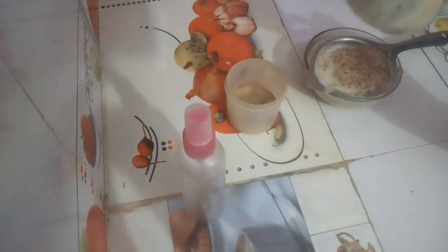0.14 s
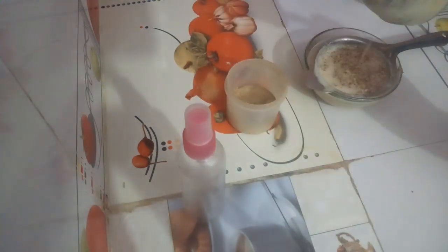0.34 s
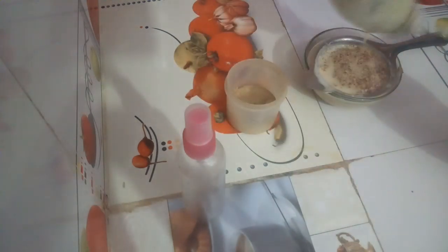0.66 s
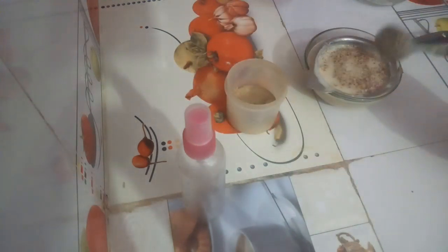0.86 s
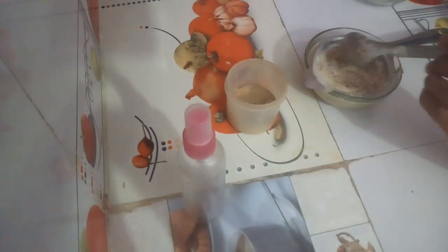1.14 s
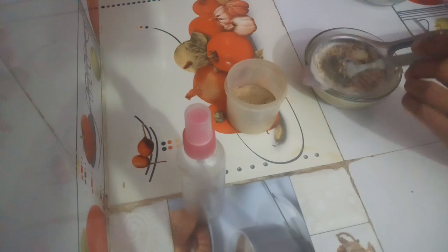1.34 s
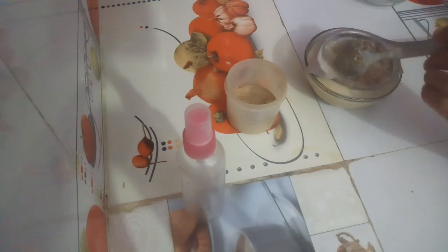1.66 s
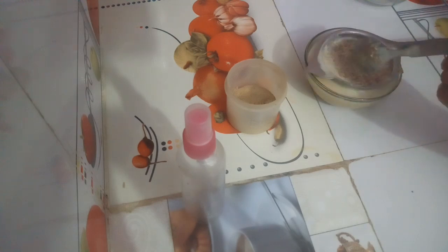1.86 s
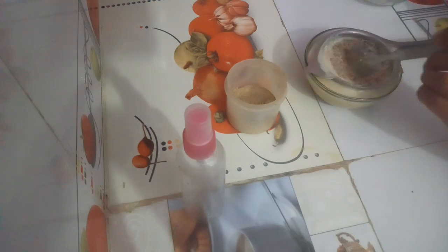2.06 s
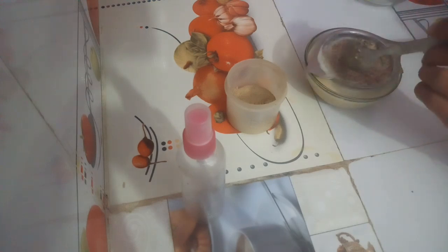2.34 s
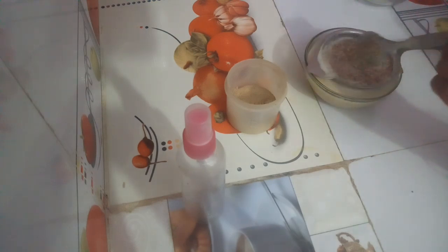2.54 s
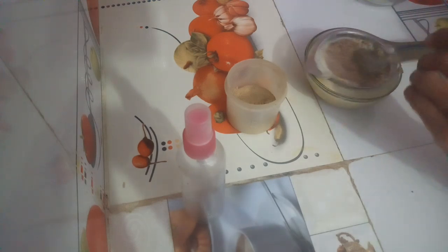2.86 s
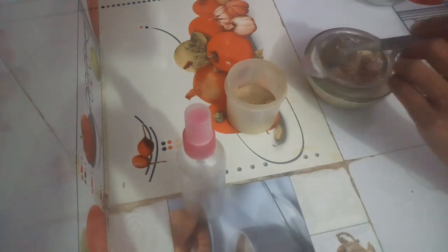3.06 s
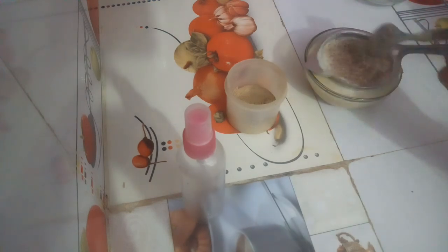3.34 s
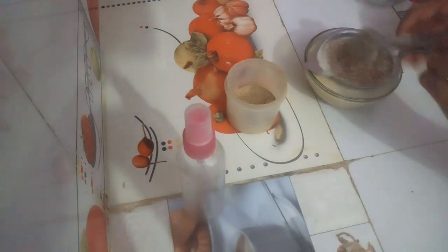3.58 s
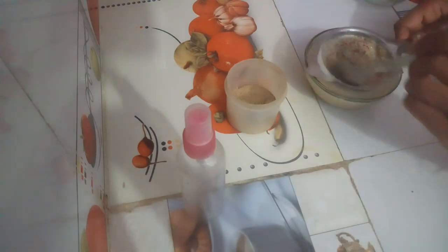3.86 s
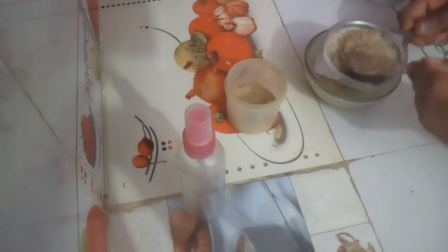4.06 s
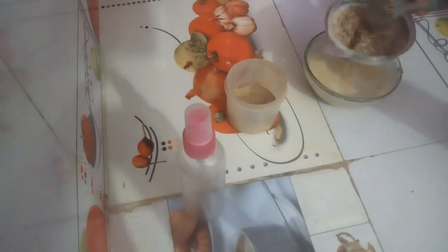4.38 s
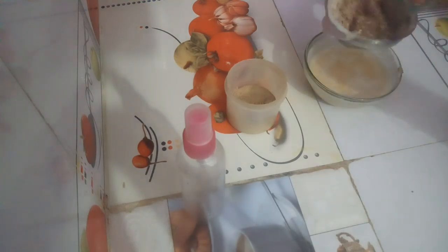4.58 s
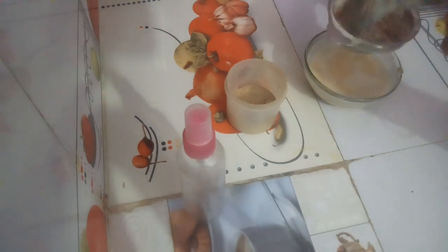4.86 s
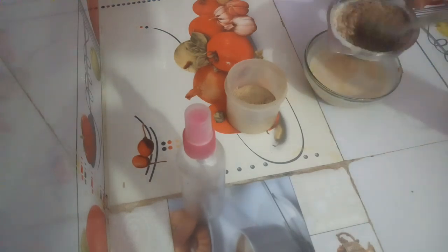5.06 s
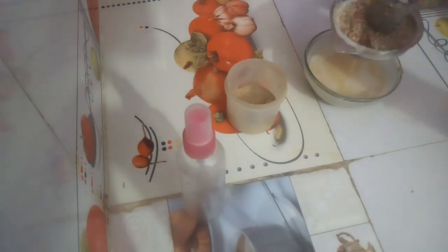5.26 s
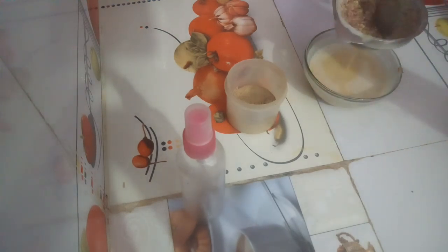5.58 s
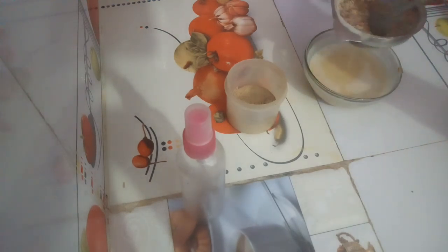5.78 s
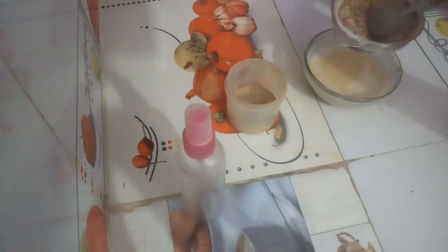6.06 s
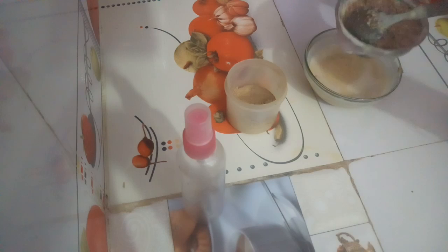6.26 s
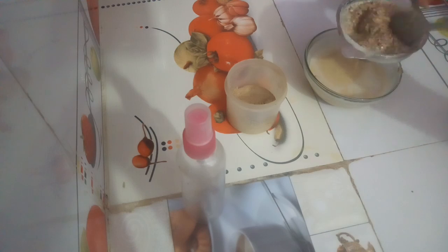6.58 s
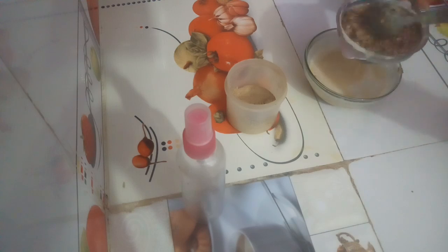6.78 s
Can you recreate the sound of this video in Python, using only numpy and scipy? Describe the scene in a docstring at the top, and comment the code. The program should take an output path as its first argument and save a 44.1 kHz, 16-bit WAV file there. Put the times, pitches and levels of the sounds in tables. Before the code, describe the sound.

Close microphone in a small tiled kitchen, with steady soft room noise and a low fridge-like hum. Paste rubs faintly on mesh as a cup is put down; a spoon is picked up and its handle knocks very loudly. After faint sliding, a glass bowl and its rim clink in two clusters. Light scrapes and ticks follow, then one hard mesh knock near the end.

```python
"""A small tiled kitchen. Over steady room noise and a fuzzy, fridge-like hum, a spoon rubs paste on a
strainer's mesh and a cup is put down: friction is dense clicks in three bands, a blow is chatter driving
resonances. Then the strainer's handle knocks; the bowl starts to bump, ringing the table top's low modes. The
spoon's edge hisses along the wires, the glass bowl and the strainer's rim are struck, and lighter mesh knocks
follow, with one hard mesh blow near the end. The tiles answer the near sounds with a short bright tail."""
import sys
import numpy as np
from scipy import signal
from scipy.fft import rfft, irfft
from scipy.io import wavfile
from scipy.ndimage import uniform_filter1d

SR = 44100
rng = np.random.default_rng(int(sys.argv[2]) if len(sys.argv) > 2 else 0)


def master_out(mix):
    """Clip the mix to full scale and print it as 16-bit PCM to the path in sys.argv[1]."""
    frames = np.transpose(np.atleast_2d(mix))
    ceiling = np.clip(frames, -1, 1)
    pcm = np.round(ceiling * 32767).astype(np.int16)
    wavfile.write(sys.argv[1], SR, pcm)


def volts_from_db(level):
    """Convert decibel levels to linear amplitude ratios."""
    exponent = np.asarray(level, float) / 20
    return 10 ** exponent


N = 305613  # length in samples
BLOCK = 88  # samples in one step of a gain curve, about 2 ms


def evened(x):
    """Normalization: scales a signal to rms 1."""
    return x / np.sqrt(np.mean(x ** 2) + 1e-20)


def read(points, hz):
    """Spectral interpolation: reads a curve on a logarithmic frequency axis."""
    point_hz, value = np.transpose(points)
    return np.interp(np.log(hz + 1), np.log(point_hz + 1), value)


def add(mix, start_s, sound):
    """Superposition: sums a sound into the mix from start_s on."""
    part = mix[round(start_s * SR):][:len(sound)]
    part += sound[:len(part)]


def band(x, lo_hz, hi_hz):
    """Band-pass filtering: keeps lo_hz to hi_hz, at rms 1."""
    sos = signal.butter(2, [lo_hz, hi_hz], "bandpass", fs=SR, output="sos")
    return evened(signal.sosfilt(sos, x))


def resonate(x, hz, width_hz):
    """Resonance by heterodyning: shifts hz (fixed or moving) to zero, low-passes, and shifts back."""
    turn = np.exp(2j * np.pi * np.cumsum(hz * np.ones(len(x))) / SR)
    decay = np.exp(-np.pi * width_hz / SR)
    return 2 * (turn * signal.lfilter([1 - decay], [1, -decay], x / turn)).real


def swells(rows):
    """Exponential growth and decay: one gain curve a row, rise and fall times each spanning 20 dB."""
    peak_s, rise_s, fall_s, level_db = np.array(rows).T[:4, :, None]
    late_s = np.arange(N // BLOCK + 1) * BLOCK / SR - peak_s
    return volts_from_db(level_db - 20 * np.maximum(-late_s / rise_s, late_s / fall_s))


def smooth(curve):
    """Linear interpolation: turns block values into sample values."""
    return np.interp(np.arange(N) / BLOCK, np.arange(len(curve)), curve)


# colour of the room noise: frequency (Hz), relative density (dB per Hz)
AIR_SPECTRUM = [(12, -55.5), (20, -23.5), (69, -20), (102, 4.5), (131, -9.5), (211, -14), (321, -23.5),
                (350, -20.5), (612, -8.5), (1680, -19.5), (2290, -29), (3030, -23.5), (10700, -43),
                (15000, -36.5), (16300, -43)]
# slow changes of the room noise: time (s), relative level (dB)
AIR_SWELL = [(0, -1), (1.2, -1), (1.9, -3.5), (2.6, 1), (4.2, 0.5), (5.8, 0.5), (6.93, 1.1)]
# appliance drone: frequency (Hz), width of each resonance stage (Hz), level (dB)
HUM = [(100.4, 16, -64), (210.5, 9.6, -70.5), (646.6, 40, -67.5)]


def kitchen():
    """Stationary random noise: coloured air with drifting patches, and a drone of noise in narrow resonances."""
    frames, hz = N // 256 + 5, np.fft.rfftfreq(1024, 1 / SR)
    real, imaginary, patches = rng.standard_normal((frames, 513, 3)).T
    patches = uniform_filter1d(uniform_filter1d(patches, 10, 0), 14, 1)  # over frequency, then time
    patches_db = 1.7 * evened(patches)
    time_s, swell_db = np.transpose(AIR_SWELL)
    swell_db = np.interp(np.arange(frames) * 256 / SR, time_s, swell_db)
    spectrum = (real + 1j * imaginary) * volts_from_db(read(AIR_SPECTRUM, hz)[:, None] + patches_db + swell_db)
    air = volts_from_db(-58) * evened(signal.istft(spectrum, nperseg=1024, noverlap=768)[1][:N])
    noise = rng.standard_normal(N)
    hum = 0
    for hum_hz, width_hz, level_db in HUM:
        drone = resonate(resonate(noise, hum_hz, width_hz), hum_hz, width_hz)
        hum = hum + volts_from_db(level_db) * evened(drone)
    return air + hum


# what each thing rings with, two lists: resonances as frequency (Hz), width (Hz; at least 19 is played),
# relative level (dB); then the colour of its clatter as frequency (Hz), relative density (dB per Hz)
CUP = [(1123, 63, -6), (1510, 140, -2), (2960, 120, 0), (4850, 120, 2), (5000, 99, 0), (6750, 150, -7),
       (7270, 160, 0), (8350, 140, 0), (10140, 69, 4.5), (11760, 90, -1.5), (12920, 90, -6.5),
       (13600, 110, 2), (14240, 69, -5)], [(180, -79), (300, -61.5), (1120, -3), (2270, -7), (3060, -4.5),
       (5980, -9.5), (10200, -5), (10900, -21), (13600, 0), (16300, -28.5)]
SPOON = [(1400, 270, -21), (1960, 160.7, -15), (2200, 76, -15), (2920, 100, -11), (4010, 70, 3.5),
         (4100, 100, -4), (4370, 75, -13), (5190, 83, -14), (6000, 142, -17), (6740, 90, -13.5),
         (6950, 130, -7), (10500, 97, -20.5), (12200, 82, -27.5)], [(180, -67), (300, -36.5), (1980, -8.5),
         (3500, -16.5), (4070, 1), (5500, -24), (7190, -17), (15200, -46.5), (16300, -101)]
HANDLE = [(1590, 120, -13), (3440, 34, -10.5), (3750, 62, -8.5), (4100, 21, -5.5), (4590, 49, -2),
          (5630, 34, -3), (6140, 46, -12), (7100, 140, -11.5), (8100, 100, -9.5), (8650, 31.24, -5.5),
          (10547, 40, -10), (12700, 28.26, -7), (15000, 190, -21), (15760, 44, -29)], [(59, -55.5),
          (100, -18), (344, -1.5), (696, -11.5), (1320, -11), (1560, -12.5), (2720, -9.5), (5740, -2.5),
          (13200, -12.5), (16300, -21)]
MESH = [(1110, 31, -3), (1670, 120, 6), (2620, 110, 7), (4530, 260, 7), (4940, 120, -34), (7570, 100, -12),
        (8400, 120, 2), (8620, 75, 5), (10400, 120, 5), (12600, 300, 1)], [(180, -103), (300, -73),
        (647, -9.5), (1330, -6), (1680, 0.5), (3220, 0.5), (8350, 4.5), (14300, -15), (16300, -34)]
BOWL = [(770, 68, -18), (1226, 130, 7.5), (1337, 32, -16), (1800, 250, -10.5), (2083, 20, -26),
        (2670, 19, 6), (2757, 16, 3.5), (2844, 20, 9), (2887, 34, -5), (3084, 86, -3), (3250, 94, 4),
        (3500, 35, -22.5), (4190, 80, -4), (4384, 26, 3.5), (5590, 103, 1), (7930, 160, -11.5),
        (8900, 44, -39), (10300, 45, -10), (14050, 71, -12)], [(60, -46), (150, -19), (400, -9), (1200, -3),
        (3000, 1), (6000, -11), (8000, -26.5), (11000, -42), (16300, -59)]
RIM = [(1594, 59, -4), (2490, 22, -18), (2868, 61, -8), (3110, 54, -28), (3500, 17, 3.5), (4440, 73, -11.5),
       (4620, 28, -10), (5220, 28, -3), (6280, 55, -5), (6200, 14, -10), (7350, 100, -8), (7720, 49, -6.5),
       (8500, 93, -14), (11200, 110, -18), (12180, 100, -11), (11500, 41, -24), (12700, 74, -29),
       (13800, 30, -29), (15000, 27, -31), (15200, 150, -39)], [(59, -55), (100, -32), (344, -3), (2060, 2),
       (2900, -1), (3160, -4), (3440, -11), (6800, -16.5), (11600, -9.5), (16300, -27)]
# sharp blows: start_s, thing, level_db (nominal peak), hardness (dB per octave), chatter t60 (s),
# pitch_hz that the struck spot favours
BLOWS = [(0, "cup", -34.5, -3, 0.2, 8000), (.126, "cup", -32, -10, 0.038, 1560),
         (.21, "cup", -45.5, -6, 0.068, 3200), (.358, "cup", -13, 3, 0.032, 4780),
         (.36, "cup", -16, -4.5, 0.019, 1310), (.373, "cup", -23, 1.2, 0.1, 4510),
         (.398, "cup", -21, -2, 0.034, 3160), (0.411, "cup", -32.5, .4, 0.054, 2600),
         (.654, "spoon", -38.5, -11, .04, 3830), (.715, "spoon", -22.5, -1.5, 0.044, 1982),
         (.757, "spoon", -21.5, 7, 0.033, 4050), (.768, "spoon", -18.5, .3, 0.026, 4600),
         (.782, "spoon", -27, 6, 0.018, 7000), (1.018, "handle", 1, .87, 0.039, 8050),
         (1.03, "handle", -7, .3, 0.028, 5550), (1.04, "handle", -10.5, .3, .051, 4500),
         (1.067, "handle", -20, -0.78, .042, 4523), (1.328, "mesh", -47.5, 0, .03, 6800),
         (1.458, "mesh", -44.5, 4, 0.049, 4690), (2.666, "bowl", -6.5, 0.2, 0.069, 4200),
         (2.674, "bowl", -10, .6, .14, 2950), (2.688, "bowl", -14.5, 2.5, 0.061, 5700),
         (2.721, "bowl", -8.5, -1, 0.098, 2890), (2.746, "bowl", -12.5, -2, 0.21, 2770),
         (2.795, "bowl", -21.5, -5, 0.15, 3000), (3.018, "rim", -12.5, -0.4, 0.057, 6300),
         (3.031, "rim", -9.5, -0.2, 0.073, 2840), (3.045, "rim", -11.5, -0.5, 0.17, 3500),
         (3.403, "rim", -33, -3, 0.092, 4296), (3.411, "rim", -36, -7, 0.061, 735),
         (3.866, "bowl", -26, -3, 0.056, 1530), (3.952, "handle", -30.5, -4.5, .06, 4280),
         (4.047, "mesh", -43, -7, 0.019, 2960), (4.126, "handle", -43.5, 1, .04, 4290),
         (5.155, "mesh", -44, .1, .03, 6800), (5.457, "mesh", -47, -11, 0.017, 2200),
         (5.624, "mesh", -51.5, -1, .03, 3952), (5.958, "mesh", -44, 0, 0.018, 8500),
         (5.968, "mesh", -40, -7, .015, 4800), (5.987, "mesh", -38.5, -2.1, 0.017, 1860),
         (6.017, "mesh", -38, -7.5, 0.013, 1700), (6.058, "mesh", -50, -4, .012, 7530),
         (6.085, "mesh", -41, -9.5, 0.016, 5000), (6.212, "mesh", -46.5, -3.5, 0.022, 7710),
         (6.358, "mesh", -9, 0.1, 0.053, 8400), (6.363, "mesh", -15.5, 0.2, .03, 1670),
         (6.374, "mesh", -29, -1, 0.043, 1690), (6.7, "mesh", -50.5, -2, 0.035, 6400)]
# drags, whose chatter swells up to a peak: the same columns, then swell time (s)
DRAGS = [(.27, "cup", -49, -13.5, .03, 1400, 0.079), (.724, "spoon", -24.5, 0.5, 0.05, 2050, .04),
         (2.87, "bowl", -35.5, -.3, 0.31, 2899, 0.1), (3.15, "rim", -34, -4, 0.21, 1040, 0.032)]
# ring over clatter for a blow of nominal 0 dB: thing, level (dB)
RING_DB = {"cup": 0, "spoon": 3.5, "handle": -2, "bowl": 1, "rim": 1.5, "mesh": 0.5}


def struck(name, thing):
    """Modal excitation: a dying chatter of contacts drives the resonances and a dense clatter."""
    modes, clatter = thing
    mode_hz, width_hz, mode_db = np.transpose(modes)[:, :, None]
    t, out = np.arange(SR // 2) / SR, np.zeros(N)
    f = np.fft.rfftfreq(len(t), 1 / SR)
    responses = volts_from_db(mode_db) / (1 + 2j * (f - mode_hz) / np.clip(width_hz, 19, 900))
    response = responses[::2].sum(0) - responses[1::2].sum(0)  # alternate modes swing in opposite phase
    dense = volts_from_db(read(clatter, f))
    rows = [row for row in BLOWS + DRAGS if row[1] == name]
    for start_s, _, level_db, hardness, t60_s, spot_hz, *drag in rows:
        swell_s = sum(drag)  # 0 for a blow
        rise = np.minimum(t / swell_s, 1) ** 2 if drag else 1 - np.exp(-t / 0.0004)
        contact = rise * volts_from_db(-60 * np.maximum(t - swell_s, 0) / t60_s)
        chatter, hiss, slips = rng.standard_normal((3, len(t)))
        bounce_db = 3.5 if drag else 2.2
        contact = contact * volts_from_db(bounce_db * evened(uniform_filter1d(slips, 70)))  # it bounces unevenly

        spot_db = 9 * np.exp(-(np.log2(f / spot_hz + 1e-9) / 0.18) ** 2)
        tilt = volts_from_db(hardness * np.log2(f / 4000 + 0.03) + spot_db)  # a harder contact is brighter
        push = chatter * contact
        if not drag:
            push[10] += 14  # one sharp contact on top of the chatter
        ring = irfft(rfft(push) * response * tilt, len(t))
        ring = ring * np.clip(5 - 12 * t, 0, 1)  # faded out from 0.33 to 0.42 s
        hiss = contact * irfft(rfft(hiss) * dense * tilt, len(t))

        ring_db = RING_DB[name] + 0.087 * level_db  # softer blows ring less
        blow = volts_from_db(ring_db) * ring / np.linalg.norm(ring) + hiss / np.linalg.norm(hiss)
        onset = blow[t < 1.5 * swell_s] if drag else blow[:300]
        add(out, start_s, volts_from_db(level_db - 10.5) * blow / np.std(onset))  # onset rms 10.5 dB below the peak
    return out


# spoon rubbing paste over the mesh: peak_s, rise time (s), fall time (s), pressure as scrape level (dB),
# brightness as fizz over scrape (dB), weight as body over scrape (dB)
STROKES = [(0.005, 0.03, 0.29, -56, -4.5, -17), (.132, 0.065, 0.17, -63.5, -20, 10.5),
           (.56, 0.13, 0.31, -54.5, -10, -0.3), (1.33, .01, 0.072, -57, -7, -14),
           (1.458, 0.024, 0.093, -53.5, -7, 0), (1.602, 0.13, 0.22, -57.5, -11, -0.8),
           (2.962, 0.079, 0.087, -56, -12.5, 12), (3.36, 0.05, .08, -54.5, -11, 1),
           (3.402, 0.0074, 0.085, -46, -9, -13), (3.55, .1, 0.43, -63.5, -9, 0.5),
           (3.867, 0.022, 0.055, -50, -10, 4), (3.95, .02, 0.091, -46.5, -9, -16),
           (4.1, 0.17, 0.23, -61.5, -5.5, -11), (5.158, 0.17, 0.059, -68, -1.1, 1.8),
           (5.625, .04, 0.22, -62, -6.5, 1.3), (5.912, 0.061, 0.055, -62, -5, 8),
           (5.958, 0.011, 0.063, -46.5, -6.5, -3), (6.11, 0.089, .1, -58, -8.5, -0.5),
           (6.4, 0.016, 0.081, -43.5, 1, -12), (6.478, 0.064, 0.029, -43, -2.5, -4.5),
           (6.55, 0.045, 0.28, -64.5, -16, -9), (6.845, 0.083, 0.37, -64, -8, -16)]


def rubbing():
    """Stick-slip friction: wet grit catches on the wires in dense uneven clicks, as scrape, fizz and body."""
    click_size = volts_from_db(1.1 * np.minimum(rng.exponential(1, N), 5))
    catches = rng.random(N) < 9000 / SR  # 9000 a second on average
    grit = click_size * catches * rng.standard_normal(N)
    pressure = swells(STROKES)
    bright_db, weight_db = np.array(STROKES).T[4:]
    scrape = band(grit, 2200, 7500) * smooth(pressure.sum(0))
    fizz = band(grit, 9400, 17000) * smooth(volts_from_db(bright_db) @ pressure)
    body = band(grit, 640, 1520) * smooth(volts_from_db(weight_db) @ pressure)
    return scrape + fizz + body


# decay of the tiled room: frequency (Hz), t60 (s)
TILES = [(250, 0.2984), (1000, 0.32), (4000, 0.29), (12000, 0.24)]


def tiles(x):
    """Reverberation: sparse reflections of random sign, each band decaying at its own rate."""
    taps = np.zeros(SR // 2)
    at = np.arange(120, len(taps) - 20, 20)
    at = at + rng.integers(0, 20, len(at))  # one reflection in every 20 samples
    taps[at] = rng.choice([-1., 1.], len(at))
    hz, t, spectrum = signal.stft(taps, SR, nperseg=128)
    decay = volts_from_db(-60 * t / read(TILES, hz)[:, None])
    tail = signal.istft(spectrum * decay, SR, nperseg=128)[1]
    return signal.fftconvolve(x, tail / np.linalg.norm(tail))[:N]


# the bowl rocking on the table top: peak_s, rise time (s), fall time (s), level_db
ROCKING = [(1.024, 0.0036, .016, -19.5), (1.076, 0.012, 0.014, -30), (1.15, 0.052, 0.3, -59),
           (1.455, 0.039, 0.064, -43.5), (1.62, 0.092, .06, -42.5), (1.685, 0.061, 0.027, -49),
           (2.676, .015, .07, -33.5), (2.726, 0.034, 0.24, -44.5), (3.002, 0.035, 0.069, -34),
           (3.104, .1, 0.051, -51), (3.36, 0.014, 0.056, -44.5), (3.415, 0.059, 0.055, -39),
           (3.864, 0.0028, 0.028, -29.5), (3.958, 0.033, 0.016, -40.5)]
# resonances of the table top: frequency (Hz), width of the first stage (Hz), relative level (dB)
TABLE = [(140, 13, -7), (209.2, 12, -8), (324, 60, 1), (341, 31.2, 2.5), (446.3, 37, -14.5), (619, 31, -1),
         (755.6, 13, -7)]


def rocking():
    """Forced vibration: uneven bumps of the bowl's foot excite the low resonances of the table top."""
    bumps = (rng.random(N) < 1500 / SR) * rng.standard_normal(N)  # 1500 a second on average
    top = 0
    for hz, width_hz, level_db in TABLE:
        mode = resonate(resonate(bumps, hz, width_hz), hz, 3 * width_hz)
        top = top + volts_from_db(level_db) * evened(mode)
    return evened(top) * smooth(swells(ROCKING).sum(0))


# spoon's edge sliding lightly over the wires: peak_s, rise time (s), fall time (s), level_db, pitch_hz of the hiss
SLIDES = [(1.9, .8, 0.44, -64, 5360), (2.4, .2, 0.16, -74.5, 3587), (5.16, .75, 0.061, -64, 5093),
          (5.3, .3, 0.65, -73, 3927), (5.88, .12, 0.25, -71.5, 5074), (6.09, .02, 0.26, -68, 4987),
          (6.28, .3, .09, -64, 5080)]


def sliding():
    """Resonant friction: fine noise in one narrow resonance of the sliding spoon, pitched by the strongest
    slide."""
    gain = swells(SLIDES)
    pitch_hz = smooth(np.array(SLIDES)[gain.argmax(0), 4])
    hiss = resonate(resonate(rng.standard_normal(N), pitch_hz, 500), pitch_hz, 660)
    return evened(hiss) * smooth(gain.sum(0))


def scene():
    """Superposition: all blows, strokes and bumps, their room tail and the steady noise."""
    things = dict(cup=CUP, spoon=SPOON, handle=HANDLE, bowl=BOWL, rim=RIM, mesh=MESH)
    blows = sum(struck(name, thing) for name, thing in things.items())
    near = blows + rubbing() + rocking() + sliding()
    highpass = signal.butter(3, 105, "highpass", fs=SR, output="sos")
    near = signal.sosfilt(highpass, near)  # small things give no bass
    return (near + volts_from_db(-5.5) * tiles(near) + kitchen())[None]


def band_limit(x):
    """A steep low-pass at the top of the band."""
    return signal.sosfilt(signal.butter(12, 16480, fs=SR, output="sos"), x)


def record(dry):
    """Saturation and band limiting: a microphone rounds off the loudest peaks and passes up to 16.3 kHz."""
    rounded = 1.1 * np.tanh(dry / 1.1)
    lowpass = signal.firwin(255, 16300, fs=SR)
    limited = signal.oaconvolve(rounded, lowpass[None], "same")
    return band_limit(limited)


dry = scene()
out = record(dry)
master_out(out)
```